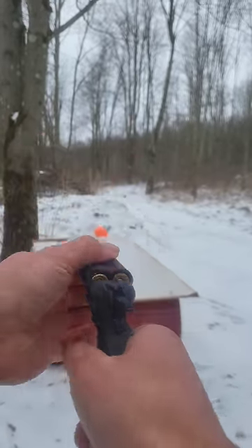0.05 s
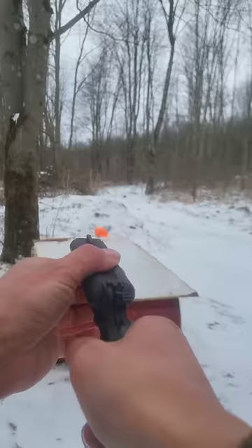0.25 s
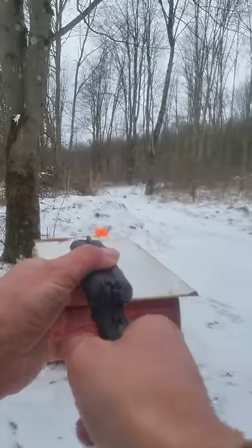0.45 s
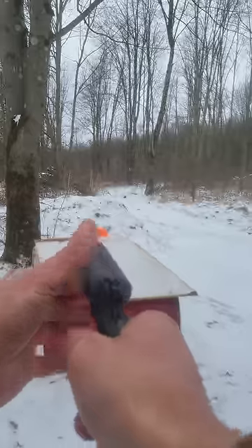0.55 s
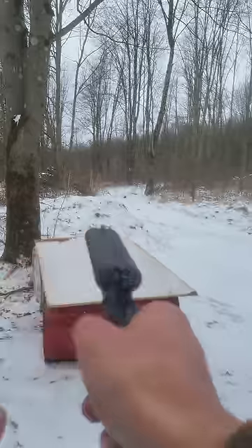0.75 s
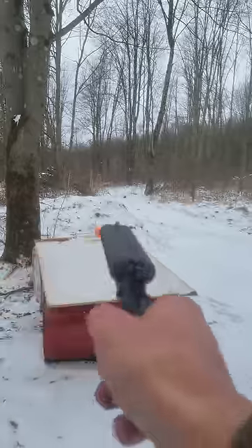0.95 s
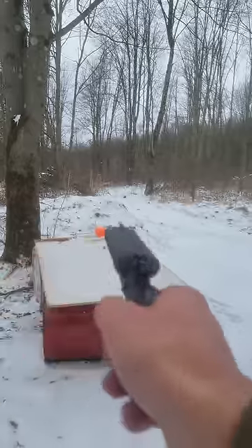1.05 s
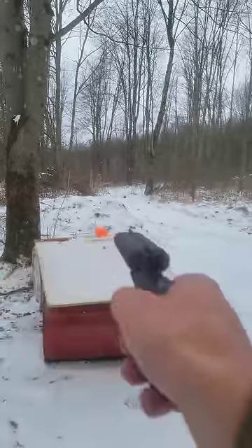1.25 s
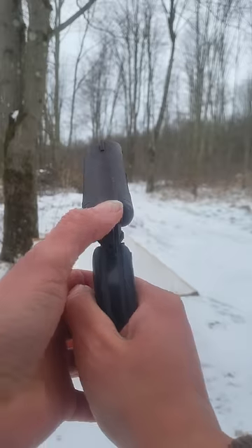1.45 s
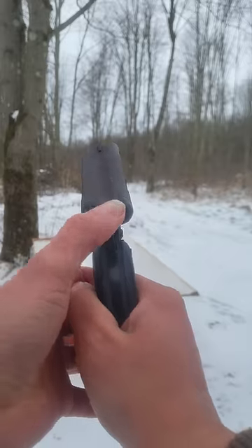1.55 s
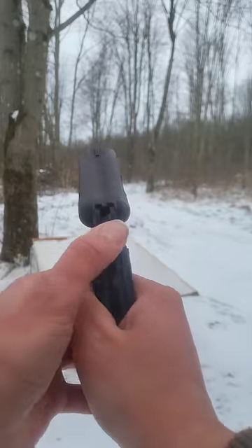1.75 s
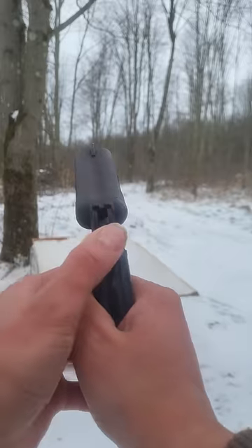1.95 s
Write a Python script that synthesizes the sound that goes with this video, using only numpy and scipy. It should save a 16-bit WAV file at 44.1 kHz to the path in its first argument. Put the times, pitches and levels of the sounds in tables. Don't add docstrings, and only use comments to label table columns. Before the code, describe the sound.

A small folding pistol closes close to the microphone: a tick, a short scrape and a loud steel snap with brief woodland scatter. Sleeve rustle and light wind rumble follow, then a faint double click of the hammer.

```python
import sys
import numpy as np
from scipy import signal
from scipy.fft import rfft, irfft
from scipy.io import wavfile
from scipy.ndimage import uniform_filter1d

SR = 44100
rng = np.random.default_rng(int(sys.argv[2]) if len(sys.argv) > 2 else 0)


def put_to_file(sound):
    columns = np.atleast_2d(sound).T
    safe = np.clip(columns, -1, 1)
    whole_steps = np.round(safe * 32767)
    wavfile.write(sys.argv[1], SR, whole_steps.astype(np.int16))


def rack_gain(trim_db):
    fader = np.asarray(trim_db, float)
    return 10 ** (fader / 20)


N = 88200
CUT_S = 1.4035
BEFORE_CUT = np.arange(N) / SR < CUT_S


def read(points, hz):
    f, v = np.transpose(points)
    return np.interp(np.log(hz + 1), np.log(f + 1), v)


def curve(points):
    s, v = np.transpose(points)
    return rack_gain(np.interp(np.arange(N) / SR, s, v))


# pitch in Hz, likeness from -1 to 1.
PORT_LIKENESS = [(60, 1), (180, 0.099), (550, -0.46), (1650, -0.26), (4970, -0.29), (15000, 0.938)]
# pitch in Hz, left over right in dB.
PORT_TILT = [(60, 3), (180, -0.5), (550, -3.0), (1650, -5), (4970, 4), (15000, 5)]


def hiss(shape, size, patchy_db, flicker_db, bumps=(), alike=1):
    hop, bins = size // 4, size // 2 + 1
    frames, hz = N // hop + 5, np.fft.rfftfreq(size, 1 / SR)
    a, b, c, d, patches = rng.standard_normal((frames, bins, 5)).T
    patches = uniform_filter1d(patches, size=size // 80, axis=0)
    patches = uniform_filter1d(patches, size=8, axis=1)
    flicker = uniform_filter1d(rng.standard_normal(frames), size=3)
    outside = (hz < shape[0][0] * .8) | (hz > shape[-1][0] * 1.1)
    colour = read(shape, hz) - 80 * outside
    colour = colour + sum(db * np.exp(-((hz - f) / width) ** 2) for f, width, db in bumps)
    same = np.clip(alike * read(PORT_LIKENESS, hz), -1, 1)[:, None]
    left = a + 1j * b
    right = same * left + np.sqrt(1 - same ** 2) * (c + 1j * d)
    tilt = np.outer([.5, -.5], read(PORT_TILT, hz))[:, :, None]
    level_db = tilt + colour[:, None] + patchy_db * patches / patches.std() + flicker_db * flicker
    spectra = np.array([left, right]) * rack_gain(level_db)
    x = signal.istft(spectra, nperseg=size, noverlap=size - hop)[1][:, :N]
    return x / x.std()


def part(modes, blows):
    hz, left_db, right_db, t60 = np.transpose(modes)[:, :, None]
    length, right_lag_s = 6144, .00008
    out, span = np.zeros((2, N + length)), np.arange(length)
    for s, db, rise, pitch, bright_db in blows:
        at = int(s * SR)
        for ch, (port_db, lag) in enumerate([(left_db, 0), (right_db, right_lag_s)]):
            t = np.maximum((at + span) / SR - s - lag, 0)
            fade_db = -60 * t / t60
            level = rack_gain(db + port_db + bright_db * np.log2(hz / 2000) + fade_db)
            level = level * (1 - np.exp(-(t / rise) ** 2))
            out[ch, at:at + length] += (-level * np.sin(2 * np.pi * hz * pitch * t)).sum(0)
    return out[:, :N]


def cracks(crack_db, blows):
    out = np.zeros(N)
    for s, db, rise, pitch, bright_db in blows:
        out[round((s + rise) * SR)] = rack_gain(crack_db + db + 2 * bright_db)
    return out


# pitch in Hz, level in dB per Hz.
AIR_COLOUR = [(88, -43), (150, -16.5), (222, -6), (406, -9), (475, -7.5), (1020, -32.5), (1260, -30),
              (3040, -33.5), (16000, -42.5)]


def quiet_air():
    air = rack_gain(-78) * hiss(AIR_COLOUR, size=1024, patchy_db=1.5, flicker_db=1.1)
    return air * rack_gain(0.5 * ~BEFORE_CUT)


# pitch in Hz, level in dB per Hz.
WIND_COLOUR = [(20, -20.5), (40, -6.5), (70, 4), (100, -6), (140, -14), (300, -28.5)]
# time in seconds, level in dB.
GUSTS = [(0, -63), (.15, -63), (.3, -65), (.5, -66.5), (.78, -63), (1.05, -64), (1.2, -61), (1.4, -63),
         (1.41, -65.5), (1.7, -65), (2, -67.5)]


def wind_rumble():
    wind = hiss(WIND_COLOUR, size=2048, patchy_db=1.5, flicker_db=1.0, alike=.45)
    return curve(GUSTS) * np.where(BEFORE_CUT, wind, wind[:, ::-1])


# pitch in Hz, level in dB per Hz.
CLOTH_COLOUR = [(88, -32), (150, -6.5), (406, 1.5), (854, -10), (1940, -8), (4860, -24.5), (6500, -34),
                (8300, -52), (12200, -39), (16000, -39)]
# pitch in Hz, width in Hz, boost in dB.
SLEEVE_HOLLOWS = [(1393.3, 96, 9.5), (2330, 180, 2), (3055, 980, 2.5)]
# time in seconds, rustle level in dB.
ARM_MOTION = [(0, -79.5), (.25, -79), (.35, -77), (.55, -80), (.68, -73.5), (.8, -64.5), (.9, -65.5),
              (1.02, -65), (1.15, -62), (1.26, -68), (1.36, -66.5), (1.403, -67.5)]


def sleeve_rustle():
    rub = hiss(CLOTH_COLOUR, size=512, patchy_db=2.5, flicker_db=-1.0, bumps=SLEEVE_HOLLOWS)
    return curve(ARM_MOTION) * BEFORE_CUT * rub


# time in seconds, level in dB.
THUMB_MOTION = [(0, -67.5), (.06, -73), (.115, -63), (.2, -73), (.3, -100), (1.4, -100), (1.41, -87.5),
                (1.7, -87.5), (1.73, -79), (1.8, -81), (1.87, -80.5), (2, -91.5)]


def thumb_rub():
    rub = hiss(CLOTH_COLOUR[3:], size=256, patchy_db=2.5, flicker_db=3.0, bumps=[(2040, 530, 6.9)])
    return curve(THUMB_MOTION) * rub


# pitch in Hz, left dB, right dB, 60 dB decay in seconds.
NUDGE_MODES = [(1845.2, -63, -59.5, .012), (2600, -62.5, -59, .012), (3583.6, -61.5, -63.5, .012),
               (4692, -68, -72.5, .015), (11300, -87.5, -83.5, 0.0062), (700, -72, -66, .012)]
# start in seconds, level in dB, rise in seconds, pitch factor, brightness in dB per octave.
NUDGE_BLOWS = [
    (.0235, 0, .001, 1.0, 3),
    (.0295, 0.5, 0.00056, 1.0, 9.5),
    (.45, -4.5, 0.001935, 1.0, -1),
]


def nudge():
    return part(NUDGE_MODES, NUDGE_BLOWS)


# pitch in Hz, left dB, right dB, 60 dB decay in seconds.
HINGE_MODES = [(2150, -62, -60, .07)]
# start in seconds, level in dB, rise in seconds, pitch factor, brightness in dB per octave.
HINGE_BLOWS = [
    (.076, 0, .008, 1.02, 0),
    (.09, 0, .008, .98, 0),
    (.103, -1, .006, .93, 0),
]


def hinge():
    return part(HINGE_MODES, HINGE_BLOWS)


# pitch in Hz,
# level in dB.
WOODS_COLOUR = [(120, -43.5), (700, -12.5), (1300, -3.5), (3700, -2.5), (5900, -4.5), (8200, -21),
                (10000, -12), (15000, -9.5)]
# start in seconds, end in seconds, end level in dB, swell in dB per
SWELLS = [
    (.09, .1228, -63, 500),
    (.207, .2435, -36, 900),
]


def grind():
    t = np.arange(N) / SR
    swell, soft_start_s = 0, .012
    for start, end, db, db_per_s in SWELLS:
        level = rack_gain(db + db_per_s * np.minimum(t - end, 0))
        swell = swell + level * np.clip((t - start) / soft_start_s, 0, 1) * (t < end)
    bumps = [(6100, 130, 8.7), (2600, 1100, 5)]  # Hz, width Hz, dB
    return swell * hiss(WOODS_COLOUR, size=256, patchy_db=2.5, flicker_db=5.5, bumps=bumps)


# pitch in Hz, left dB, right dB, 60 dB decay in seconds.
CATCH_MODES = [(600, -56, -43, .016), (1453, -44, -36, 0.02), (2197, -38.5, -31, 0.022),
               (2820, -28, -23.5, 0.015), (3610, -20.5, -18.5, 0.015), (4227, -20.5, -35, 0.0045),
               (4623, -19.5, -31.5, 0.011), (5480, -19.5, -32, 0.012), (7125, -20, -38, .016),
               (6850, -22.5, -34.5, .005), (9940, -22, -32.5, 0.01), (11347, -28.5, -37.5, 0.008),
               (14930, -24, -30.5, .007), (7910, -26, -35, .004)]
# start in seconds, level in dB, rise in seconds, pitch factor, brightness in dB per octave.
CATCH_BLOWS = [
    (0.1228, 0.5, 0.000329, 0.987, 0),
    (.1237, -6, 0.00023, 1.04, 0.5),
    (0.1326, -20, .0005, 1.02, 0),
    (.1600, -38, .001, 1.0, -0.5),
]


def catch():
    return part(CATCH_MODES, CATCH_BLOWS), cracks(-21.5, CATCH_BLOWS)


def woods(clicks, steel):
    t = np.arange(SR // 2) / SR
    crack, near, far = [rack_gain(db - 60 * t / t60) / np.linalg.norm(rack_gain(-60 * t / t60))
                        for db, t60 in [(0, .011), (-5, .15), (-20, .4)]]  # dB, decay s
    a, b, lumps = rng.standard_normal((3, len(t)))
    build_s, knee_s, lump_db = .0028, .085, 24
    scatter = near * rack_gain(-10 * (t / knee_s) ** 4) + far
    scatter = scatter * (1 - np.exp(-(t / build_s) ** 2))
    scatter = scatter * rack_gain(lump_db * uniform_filter1d(lumps, size=100))
    hz = np.fft.rfftfreq(len(t), 1 / SR)
    colour = rack_gain(read(WOODS_COLOUR, hz))
    hollow_db = -10 * np.exp(-((hz - 8100) / 900) ** 2)
    barrel_db = 3 * np.exp(-((hz - 5900) / 400) ** 2)
    sent = clicks + rack_gain(-28.5) * steel.sum(0)
    out = 0
    for drive, shape, tint in [(clicks, crack, 1), (sent, scatter, rack_gain(hollow_db + barrel_db))]:
        tail = np.roll(shape * np.array([a, .5 * a + b]), 1024, axis=1)
        tail = irfft(rfft(tail) * colour * tint, len(t)) * signal.windows.tukey(len(t), .05)
        out = out + signal.fftconvolve(drive[None], tail, axes=1)[:, 1024:N + 1024]
    return out


# pitch in Hz, left dB, right dB, 60 dB decay in seconds.
SEAR_MODES = [(700, -66, -60, .012), (1660, -59, -57, .011), (2520, -49, -49, .009), (3350, -57, -59, .01)]
# start in seconds, level in dB, rise in seconds, pitch factor, brightness in dB per octave.
SEAR_BLOWS = [
    (.1806, 0, .0005, 1.0, 0),
    (1.7225, -13, .001, .95, 9),
    (1.638, -17, .001, .93, 3),
    (.2816, 9, .0006, .97, 0),
]


def sear():
    return part(SEAR_MODES, SEAR_BLOWS)


# pitch in Hz, left dB, right dB, 60 dB decay in seconds.
SLIDE_MODES = [(1300, -39.5, -26.5, 0.017), (1977, -26.5, -14.5, 0.011), (3209.7, -25.5, -27.5, 0.016),
               (4070, -28, -27.5, 0.022), (5777.4, -11.5, -30, 0.016), (14700, -25.5, -36, 0.009),
               (212.8, -44.5, -47, 0.035), (9810, -36, -40, 0.019)]
# start in seconds, level in dB, rise in seconds, pitch factor, brightness in dB per octave.
SLIDE_BLOWS = [
    (.2221, -26, .001, 0.9696, -3.5),
    (0.231, -18, .002, 1.0, -0.5),
    (0.2372, -4.5, .001, 0.876, 0.5),
    (0.2402, 4.5, 0.0013, 0.9937, 0.5),
]


def slide():
    return part(SLIDE_MODES, SLIDE_BLOWS)


# pitch in Hz, left dB, right dB, 60 dB decay in seconds.
BREECH_MODES = [(431.6, -32, -28, 0.015), (768.66, -26, -22, 0.014), (1454, -31.5, -8, 0.01),
                (1731, -29.5, -1, 0.005), (2421, -17.5, -9, 0.015), (2831, -9, -16, .009),
                (3176.4, -6.5, -10.5, 0.009188), (4166, -18, -13, .008), (5319, -14.5, -14, 0.0066),
                (5801, -6.5, -19.5, 0.011), (6359.3, -10.5, -25.5, .005), (11305, -24, -21, 0.0055),
                (13654, -14.5, -9.5, 0.0053), (14760, -12.5, -16, .005)]
# start in seconds, level in dB, rise in seconds, pitch factor, brightness in dB per octave.
BREECH_BLOWS = [
    (0.2441, 3.5, 0.00033, 1.0023, 0.000073),
    (0.2453, -11, .0004, 1.02, 0),
    (0.2541, -28, .001, 0.9, 0.0062),
    (0.2813, -29, .001, 1.0, 0.0014),
]


def breech():
    return part(BREECH_MODES, BREECH_BLOWS), cracks(-4, BREECH_BLOWS)


# pitch in Hz, left dB, right dB, 60 dB decay in seconds.
PORT_MODES = [(70, -42, -44, .17), (38, -52, -51, .14)]
# start in seconds, level in dB, rise in seconds, pitch factor, brightness in dB per octave.
PUFFS = [
    (.268, -3, .01, .95, 0),
    (1.292, 0, .012, 1.0, 0),
]


def port_puffs():
    return part(PORT_MODES, PUFFS)


# pitch in Hz, left dB, right dB, 60 dB decay in seconds.
GRIP_MODES = [(179.7, -42.5, -35.5, 0.0296), (368, -53, -45, 0.0492), (1660, -67.5, -46.5, 0.0135),
              (4710, -51, -72.5, 0.0068)]
# start in seconds, level in dB, rise in seconds, pitch factor, brightness in dB per octave.
GRIP_BLOWS = [
    (0.9472, 0, 0.0019, 0.94, 0.0079),
]


def grip():
    return part(GRIP_MODES, GRIP_BLOWS), cracks(-44.5, GRIP_BLOWS)


# start in seconds, level in dB.
ZIP_TINKLES = [
    (1.364, -63),
    (1.373, -72),
    (1.382, -62.5),
    (1.391, -67.5),
]


def zip_tab():
    blows = [(s, db, .0015, rng.uniform(.98, 1.03), 0) for s, db in ZIP_TINKLES]
    return part([(6386, 0, -14, .0173)], blows)


def cut_tick():
    out = np.zeros(N)
    out[round(CUT_S * SR) - 30] = rack_gain(-61.5)
    return out


# pitch in Hz, left dB, right dB, 60 dB decay in seconds.
HAMMER_MODES = [(1430, -75.5, -56.5, 0.0187), (2000.5, -41, -33, 0.0188), (2775, -77.5, -44, 0.00666),
                (3420, -49.5, -58, 0.0075), (3940, -49, -50.5, 0.0095), (4570, -46.5, -54, 0.0112),
                (5522, -43.5, -59.5, 0.00814), (6457, -43.5, -69, 0.0065), (9220, -55.5, -68, 0.00395),
                (11430, -52.5, -73.5, 0.00355), (14360, -55, -69.5, 0.00305)]
# start in seconds, level in dB, rise in seconds, pitch factor, brightness in dB per octave.
HAMMER_BLOWS = [
    (1.7234, -11.5, 0.00228, 1.081, -7),
    (1.8392, -7.5, 0.000795, 1.013, 8),
    (1.846, -14, 0.00211, 1.04, -15.5),
    (1.853, -11.5, 0.00195, 1.0, -6),
    (1.8587, -1, 0.001124, 0.991, 5.5),
    (1.883, -24.5, 0.0014, 1.017, -8.5),
]


def hammer():
    return part(HAMMER_MODES, HAMMER_BLOWS), cracks(-49, HAMMER_BLOWS)


def scene():
    rings, snaps = zip(catch(), breech(), grip(), hammer())
    steel = sum(rings) + nudge() + hinge() + sear() + slide()
    steel = signal.sosfilt(signal.butter(2, 130, "high", fs=SR, output="sos"), steel)
    gun = steel + grind() + woods(sum(snaps), steel)
    person = sleeve_rustle() + thumb_rub() + zip_tab()
    return gun + person + port_puffs() + quiet_air() + cut_tick() + wind_rumble()


def top_cut(x):
    return signal.sosfilt(signal.butter(12, 16320, fs=SR, output="sos"), x)


def record(dry):
    taps = signal.firwin(255, 15950, window=("kaiser", 8), fs=SR)
    mix = signal.oaconvolve(dry, taps[None], "same")
    return top_cut(mix)


dry = scene()
out = record(dry)
put_to_file(out)
```